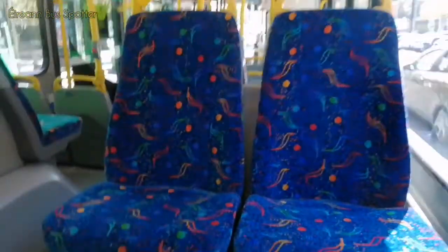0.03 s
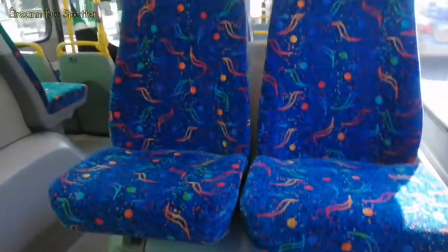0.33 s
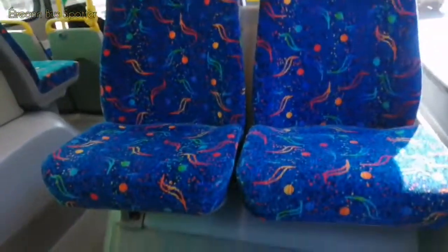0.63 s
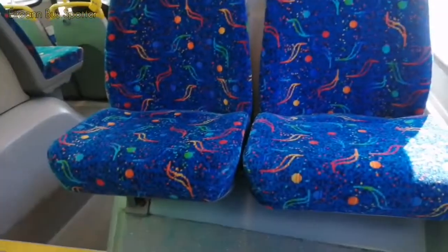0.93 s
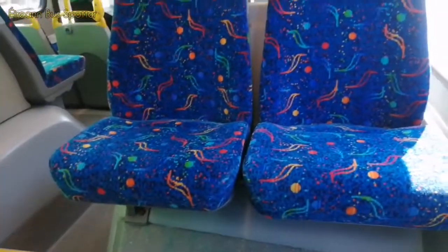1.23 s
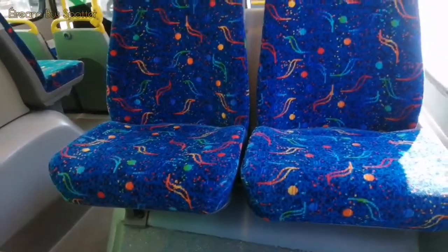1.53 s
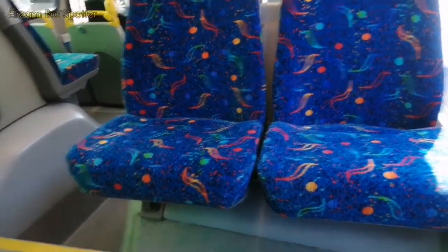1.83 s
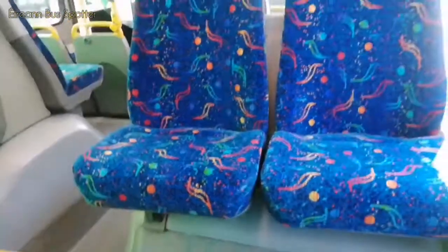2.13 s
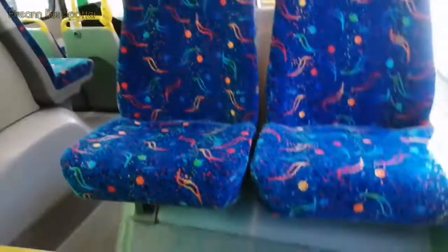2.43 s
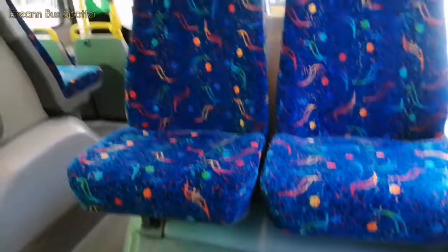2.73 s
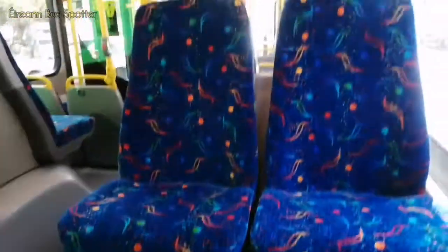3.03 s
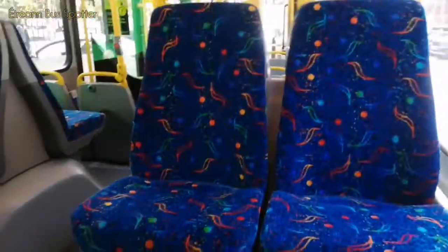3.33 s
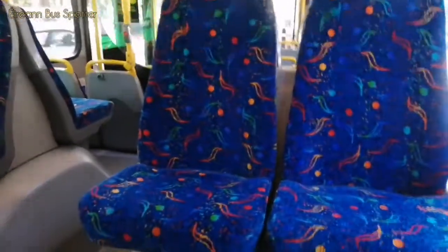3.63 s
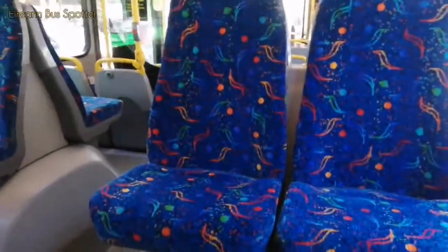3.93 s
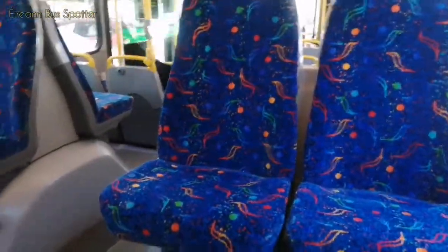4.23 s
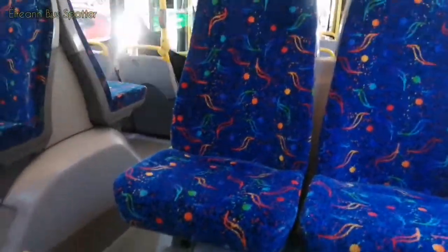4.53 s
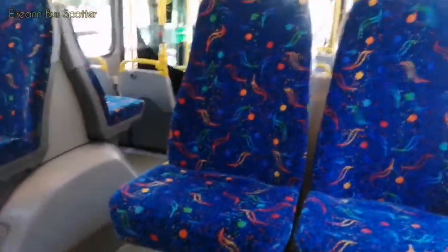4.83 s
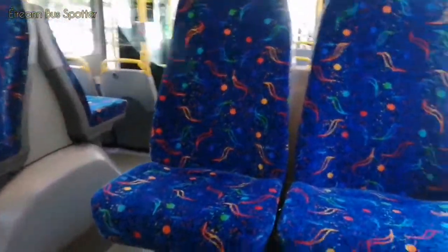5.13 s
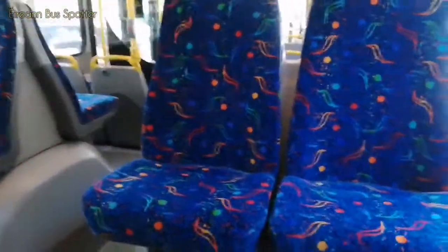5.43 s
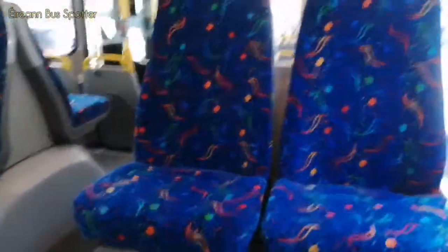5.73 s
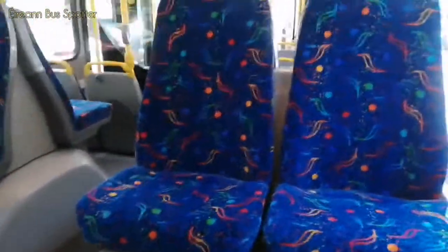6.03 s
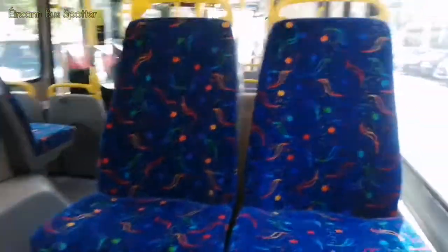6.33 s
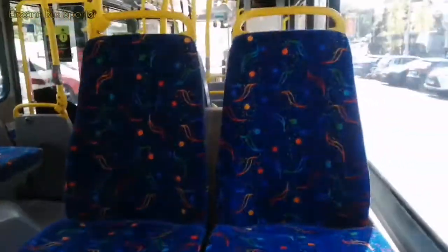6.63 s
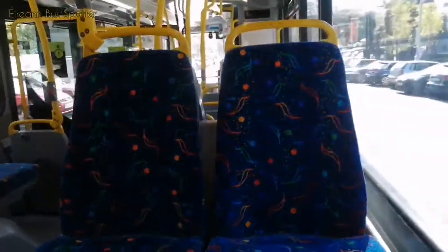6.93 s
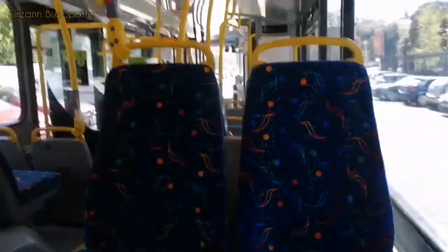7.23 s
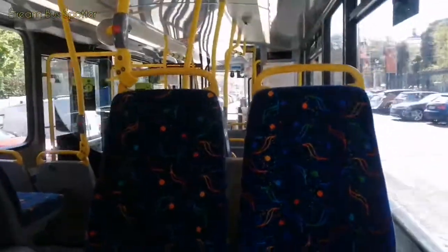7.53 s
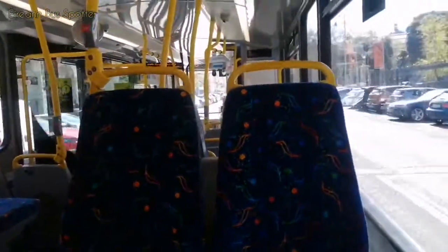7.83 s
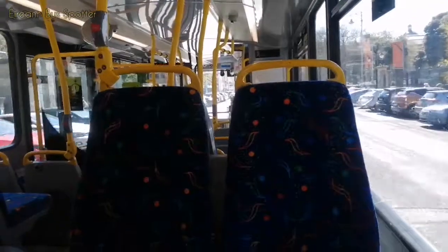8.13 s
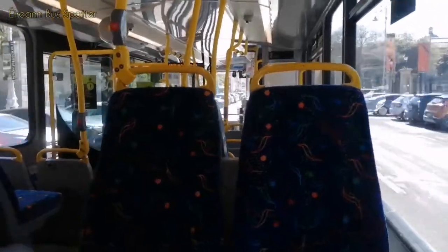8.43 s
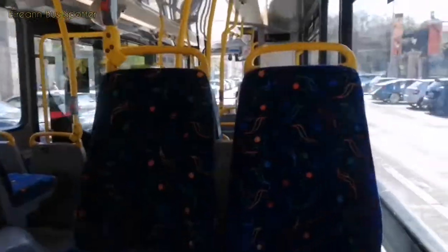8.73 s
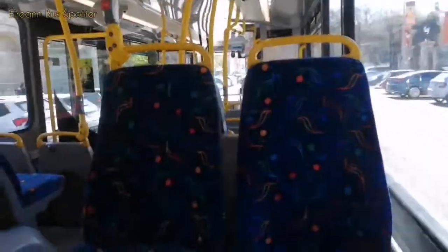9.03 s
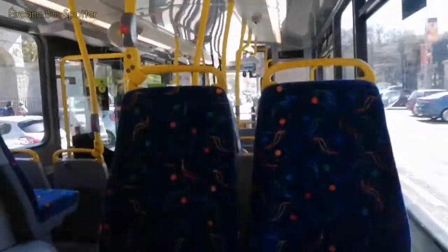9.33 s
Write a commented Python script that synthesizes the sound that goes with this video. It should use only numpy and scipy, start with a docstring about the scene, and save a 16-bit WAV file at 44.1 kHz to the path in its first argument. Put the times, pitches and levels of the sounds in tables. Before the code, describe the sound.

A city bus moves off with a faint hiss of air and a brief buzzing shudder, heard from a passenger seat. The diesel engine rumbles and booms, rising and dropping through gear changes with a faint whine. Tyre and road rumble grow as it gathers speed. Bumps thump the floor, a loose metal fitting clanks past the middle, and panels and trim rattle most busily near the end.

```python
"""A hiss of air and a low shudder with a buzzing panel: a city bus moves off, heard from inside.
The diesel climbs through three gear changes, booming as its shaft harmonics cross the cabin's
resonances. Meshing gears whine, air sings in the intake, and the tyres rumble louder with speed.
Loose trim buzzes and chatters; bumps set the floor booming and fittings clicking and knocking."""
import sys
import numpy as np
from scipy import signal
from scipy.fft import rfft, irfft, next_fast_len
from scipy.io import wavfile
from scipy.ndimage import map_coordinates

SR = 44100
rng = np.random.default_rng(int(sys.argv[2]) if len(sys.argv) > 2 else 0)


def to_wav(s):
    """Save 16-bit WAV."""
    ch = np.atleast_2d(s).T  # columns
    pcm = np.round(np.clip(ch, -1, 1) * 32767)  # PCM
    wavfile.write(sys.argv[1], SR, pcm.astype(np.int16))


N = 422037
TIME = np.arange(N) / SR

# crankshaft speed: t/s, rate/(turns/s)
SHAFT_SPEED = [(0, 11), (.2, 11.3), (1, 17.4), (1.6, 21.4), (2, 22.8), (2.5, 18), (2.8, 18.7), (3.5, 22),
               (4.1, 27), (4.55, 29.3), (5.35, 23.3), (5.7, 22.9), (6.55, 26.3), (7.15, 22.2), (7.5, 21.6),
               (8.2, 23.2), (8.9, 24.5), (9.3, 21.7), (9.57, 20.5)]
# road speed: t/s, v/(km/h)
ROAD_SPEED = [(0, 3), (2, 10.5), (2.9, 11.5), (4.7, 22), (6.4, 24.4), (6.85, 26.2), (8, 29.45), (8.6, 31),
              (9.57, 32)]
CRUISE_KMH, CRUISE_TURNS_PER_S = 25, 23  # reference speeds for the levels
# stretches of road: middle t/s, length/s, gain/dB of body heave, tyres, panels, trim, engine cover
ROAD_STRETCHES = [(.5, 0.18, 5.5, -5.5, 15, -3.5, -2), (1.54, 0.41, 5.5, 0, -1.5, 5.5, 1),
                  (2.12, 0.43, -1.5, 4.5, 6, 5, 5), (3.07, 0.16, 3.5, 1, 14.5, -4.5, 1.5),
                  (3.35, 0.15, -3, -2.5, 10, -1.5, 0), (3.74, 0.93, 0, 1.5, -3.5, 3, 1.5),
                  (5.08, 0.55, -1, 1, -2.5, 2.5, 3.5), (5.72, 0.56, 2.5, 1.5, 8, 4.5, 4.5),
                  (6.13, 0.13, 1.5, 0, 2, 5, 2), (6.48, 0.54, 4, 3, 10, 7, 7),
                  (7.35, 0.2, 1, 0, 6.5, 6, 3.5), (7.65, 0.45, 0, -1.5, 0, 0.5, -2),
                  (8.42, 0.27, 2, 1.5, 5, 3, 6), (8.88, 0.44, 1.5, 0.5, 9.5, 8.5, 10),
                  (9.37, 0.16, -4, 1, 6.5, 3.5, 4.5)]

# noise spectra: f/Hz, relative density/dB
RUMBLE_SPECTRUM = [(6, -26.5), (16, 2), (28, 2.5), (46, -4.5), (63, -3), (73, 2.5), (84, -0.5), (96, 1),
                   (115, -6.5), (160, -39.5)]  # shaken floor
DRONE_SPECTRUM = [(80, -38), (115, -5), (135, 0), (157, 3.5), (172, -2), (220, -4), (252, -7), (272, -7),
                  (305, -11), (350, -22.5), (500, -56)]  # body and cabin air
TYRE_SPECTRUM = [(220, -45), (325, -0.5), (430, 2), (500, -7.5), (545, -3.5), (620, -6), (720, -8.5),
                 (900, -17), (1400, -24), (3000, -61)]
PANEL_SPECTRUM = [(450, -22.5), (780, 2), (950, 5.5), (1100, -2), (1280, 1.5), (1480, -10), (1900, -25.5),
                  (3000, -21.5), (6000, -62.5)]
TRIM_SPECTRUM = [(1200, -37.5), (2000, -13), (2900, -6.5), (3800, -16), (4500, -6), (5100, 1.5),
                 (6000, 1.5), (6600, 4.5), (7100, 5), (7450, -7.5), (7750, -43.5), (8100, -47.5)]
COVER_SPECTRUM = [(900, -26), (1500, -0.5), (1850, -0.5), (2120, 0.5), (2350, -0.5), (2700, 4),
                  (3000, -2.5), (3250, 3), (3700, -8), (4400, -5.5), (4850, -7), (5200, -2.5), (5600, -13),
                  (8000, -30.5)]  # engine cover
TICK_SPECTRUM = [(900, -24), (2200, -9), (2800, 3.5), (3900, -0.5), (5100, 2), (6500, 3), (7450, -5),
                 (8000, -32)]  # struck fitting
RATTLE_SPECTRUM = [(300, -32.5), (800, -2), (1600, -6), (2400, -1), (3100, 2), (3900, -10.5), (5100, -0.5),
                   (6000, -5), (6900, 6), (7450, -5.5), (8000, -41.5)]  # jolted panel
BUZZ_SPECTRUM = [(150, -4), (350, 3.5), (480, -5.5), (700, -5.5), (890, -0.5), (1000, -4), (1130, -5),
                 (1300, -11), (1550, -28), (2300, -26.5), (3000, -29), (3400, -19), (3800, -35),
                 (7500, -42)]  # slapping panel

# resonances: f/Hz, bandwidth/Hz, relative level/dB
KNOCK_MODES = [(554, 300, -6), (770, 90, -0.5), (880, 51, -4.5), (967, 46, -4), (1060, 40, -7.5),
               (1360, 71, -11.5), (1490, 150, -14)]
INTAKE_LOW_MODES = [(2090, 51, -6.5), (2540, 100, -11), (2874, 220, 1.5), (3164, 430, -1.5)]
INTAKE_HIGH_MODES = [(4960, 280, -3.5), (5620, 340, -0.5)]
GEAR_CASE_MODES = [(1280, 110, -2.5), (3220, 60, 5)]
CABIN_MODES = [(20.8, 4.9, -33.5), (28, 5.9, -24.5), (34.2, 1.3, -38), (41.3, 5.5, -32.5), (48.3, 9.9, -34),
               (57, 2, -39), (72.4, 17, -28), (88, 7.6, -35), (115.4, 11, -28), (135.8, 11.4, -23),
               (155.6, 11, -28)]
# antiresonances of the cabin: f/Hz, bandwidth/Hz
CABIN_NULLS = [(32.2, 1.5), (45.2, 1.9), (53, 2.2)]

# bumps that boom: t/s, rise/s, f/Hz, peak level/dB
BUMP_BOOMS = [(1.45, .012, 145, -28), (1.735, 0.0096, 140, -20), (1.825, 0.018, 132, -23),
              (2.116, 0.019, 223, -30.5), (2.339, 0.013, 190, -30), (3.495, 0.015, 130, -23.5),
              (3.745, 0.025, 148, -22), (3.985, .014, 165, -28), (5.289, 0.045, 28.5, -21),
              (5.83, 0.042, 21.5, -18.5), (6.46, .03, 20, -15), (8.214, 0.02, 150, -20),
              (8.46, 0.024, 145, -23), (8.68, 0.096, 26, -17.5), (8.815, 0.021, 149, -20.5),
              (9.086, 0.01, 210, -24)]
# small fittings: t/s, relative level/dB, ring f/Hz, ring level/dB re the tick, ring T60/s
FITTING_CLICKS = [(0.459, -40, 3000, -12, .04), (0.672, -51, 2980, 0, .2), (0.786, -46, 6600, -10, 0.2),
                  (0.921, -45, 3100, -4, 0.38), (0.977, -22.5, 3060, -11, 0.024),
                  (1.9879, -36.5, 6950, -5, .12), (3.8456, -47, 6950, 4, 0.15),
                  (4.939, -37, 6500, 2.5, 0.082), (4.972, -42, 1610, 2, 0.14), (4.978, -31, 5200, 2, 0.058),
                  (5.209, -35.5, 6160, 3.5, .07), (6.0968, -39, 7100, -7, 0.091),
                  (6.645, -35, 5400, -6, .06), (6.66, -44, 2650, 5, 0.093), (6.9503, -32.5, 5200, 0, 0.051),
                  (7.612, -42, 2780, 3, 0.3), (8.007, -41.5, 6770, 3, 0.046), (8.4928, -34, 6900, 2, 0.055),
                  (8.559, -39, 2950, 4.5, 0.055), (8.816, -37, 2690, 4.5, 0.081),
                  (8.8865, -29, 6720, 7, 0.14), (8.962, -44, 2780, 2, 0.11), (9.005, -41, 2600, 7.5, 0.088),
                  (9.051, -31, 5560, -3, 0.068), (9.065, -39, 2700, 6, 0.086),
                  (9.087, -40, 2740, 1.5, 0.11), (9.1567, -32, 6840, 0, 0.054), (9.207, -44, 2800, 0, .07),
                  (9.237, -32.5, 6740, 3, .045), (9.392, -47, 2650, 0, 0.084)]
# jolted panels: t/s, relative level/dB, knock gain/dB, thump gain/dB, rattle T60/s
PANEL_JOLTS = [(1.363, -30.5, -8, -2, 0.39), (1.448, -41, 2.5, 6.5, 0.52), (2.347, -30, -5, 0.5, 0.28),
               (3.667, -36, -5, -3, 0.5), (5.187, -33, -28, -5, 0.34), (5.574, -49, -12, 4, 0.2),
               (6.618, -35.5, -4, -5, 0.96), (7.293, -36.5, -6, -1, 0.3), (7.351, -36, 1, 2, 1),
               (8.215, -30.5, -12, 1, 0.42), (8.259, -30.5, -2, -1, 0.11), (8.526, -25, -3.5, -7, 0.45),
               (8.707, -43, -5, 4, 0.21), (8.77, -29, -27, 3, 0.34), (8.826, -22, -5, -4, 0.18),
               (8.901, -25.5, -1.5, -6, 0.18), (9.087, -27.5, -7, -6, 0.23), (9.19, -27.5, -7, -5, 0.27),
               (9.299, -29, -6, -6, 0.17), (9.372, -26.5, -11, -3.5, 0.28)]
# a loose metal fitting: t/s, level/dB, f/Hz, jingle level/dB, jingle f/Hz, jingle T60/s
METAL_CLANKS = [(5.736, -35.5, 953, -55, 6100, 0.1), (5.865, -35, 967, -43, 6100, .1),
                (6.334, -34, 1038, -54, 6100, .1), (6.383, -26.5, 1027, -41, 6100, 0.17),
                (6.407, -48, 1050, -41, 5450, 0.23), (6.429, -33.5, 1114, -41, 5570, .2),
                (6.52, -27.5, 1030, -36, 6230, 0.12)]
# its modes: frequency ratio, relative level/dB, T60/s
METAL_MODES = [(.85, -3.5, .09), (1, -2.5, 0.086), (1.17, -6.5, 0.085), (2.15, -22.5, .07), (2.7, -21, .08),
               (3.2, -18.5, 0.076)]
# body panels under strain: middle t/s, length/s, f/Hz, level/dB
WALL_HUMS = [(2.108, 1, 270, -42), (5.099, 0.94, 421, -50), (6.5, 0.58, 290, -44), (6.557, 0.33, 532, -55),
             (8.341, 0.59, 275, -40.5), (8.914, 0.43, 319, -40.5)]
# surges of intake air: middle t/s, length/s, gain/dB of the low modes, of the high modes
INTAKE_SURGES = [(1.05, 0.98, -5, 14.5), (2.03, 0.3, 7, 7.5), (2.55, 0.34, 11.5, -11), (3.5, 0.46, -1, 6),
                 (4.2, 0.3, -0.5, 11)]
# intake whistles: start t/s, loudest t/s, end t/s, level/dB
INTAKE_WHISTLES = [(0.694, 1.148, 1.45, -68), (3.2, 3.9, 4.36, -62.5)]
# gearbox whines: start t/s, loudest t/s, end t/s, cycles per turn, level/dB, flutter depth
GEARBOX_WHINES = [(.8, 1, 1.3, 117.5, -70, .9), (3.05, 3.35, 3.9, 78.5, -70.5, 1),
                  (3.82, 4.1, 4.54, 78.5, -59, 1), (3.98, 4.17, 4.42, 116.5, -57.5, 2),
                  (3.95, 4.33, 4.8, 44, -62, 2), (3.9, 3.9, 4, 15.1, -40.5, .2)]
# axle whines under load: start t/s, loudest t/s, end t/s, level/dB
AXLE_WHINES = [(4.3, 5.098, 6.4, -45.5), (6.544, 6.951, 7.15, -46), (7.026, 7.303, 7.7, -46),
               (7.6, 8.34, 8.76, -43)]
# weak engine orders (multiples of the shaft speed): order, relative level/dB
WEAK_ORDERS = [(3, -8.5), (5, -8.5), (7, -12), (8, -14), (9, -20.5), (10, -21), (12, -26), (14, -29),
               (16, -22.5), (18, -31.5)]
# strong orders before the cabin's gain: order, level/dB, idle gain/dB, gain/dB per road speed doubling
STRONG_ORDERS = [(1, -3, -2, 1.5), (2, 1, -2, 0.5), (4, -0.56, -12, -1), (6, -7.5, 1, 3)]
# orders that drone under load: middle t/s, length/s, order, level/dB
LOAD_DRONES = [(3.6, .6, 4, -34), (5.35, .5, 4, -36), (5.65, .5, 3.25, -35), (6.35, .5, 6, -34),
               (6.9, .4, 4, -33), (4.95, .4, 6, -35), (7.3, .8, 3.25, -27.5), (7.9, .4, 6, -33),
               (8.12, .4, 7, -34), (8.45, .5, 6, -31)]


def amp(db):
    """Decibels to amplitude ratio."""
    return 10 ** (np.asarray(db) / 20)


def unit(x):
    """Normalisation to rms 1."""
    return x / np.sqrt(np.mean(x ** 2) + 1e-20)


def curve(rows):
    """Linear interpolation of (t/s, value) points at every sample."""
    return np.interp(TIME, *np.transpose(rows))


def wobble(rate):
    """Smooth random modulation, rate knots a second."""
    knots = rng.standard_normal(int(N * rate / SR) + 4)
    return map_coordinates(knots, [TIME * rate], mode="nearest")


def swells(rows):
    """Summed Gaussian swells (middle t/s, length/s, heights): one curve per column of heights."""
    return sum(np.outer(heights, .5 ** ((2 * (TIME - s) / length) ** 2)) for s, length, *heights in rows)


def gate(start, attack, end, release):
    """Trapezoidal envelope from 0 to 1 and back."""
    return np.clip(np.minimum((TIME - start) / attack, (end - TIME) / release), 0, 1)


def add(track, s, sound):
    """Superposition of a sound on a track at time s."""
    part = track[max(0, round(s * SR)):][:len(sound)]
    part += sound[:len(part)]


def filtered(x, response):
    """Linear filtering: the spectrum of x times a frequency response."""
    m = next_fast_len(len(x) + 8192)
    return irfft(rfft(x, m) * response(np.fft.rfftfreq(m, 1 / SR)), m)[:len(x)]


def coloured(x, spectrum):
    """Spectral shaping by (f/Hz, level/dB) points, at rms 1."""
    f, db = np.transpose(spectrum)
    return unit(filtered(x, lambda hz: amp(np.interp(np.log(hz + 1), np.log(f), db, -120, -120))))


def noise(spectrum, n=N):
    """Coloured Gaussian noise of rms 1."""
    return coloured(rng.standard_normal(n), spectrum)


def resonant(x, modes):
    """Parallel second-order resonators of alternating sign, at rms 1."""
    return unit(filtered(x, lambda f: sum(
        (-1) ** k * amp(db) * 1j * f * width / (hz * hz - f * f + 1j * f * width)
        for k, (hz, width, db) in enumerate(modes))))


def ringing(modes, n=N):
    """Resonators excited by white noise."""
    return resonant(rng.standard_normal(n), modes)


def contacts(rate, spread_db, t60):
    """Envelope of random impacts, rate a second, whose decaying energies add; rms 1."""
    hits = (rng.random(N) < rate / SR) * amp(spread_db * np.clip(rng.standard_normal(N), -2, 2))
    decay = amp(-60 * TIME[:SR // 4] / t60)
    energy = signal.fftconvolve(hits ** 2, decay ** 2)[:N]
    return unit(np.sqrt(np.abs(energy)))


def firing(angle, depth_db):
    """Amplitude modulation at the firing rate, twice a turn; rms 1."""
    return unit(amp(depth_db * np.cos(2 * angle)))


def road(angle, kmh, heave_db, tyre_db):
    """Structure-borne noise: tyres shake the floor and cabin air, and roar under the body."""
    doublings = np.log2(kmh / CRUISE_KMH)
    rumble = noise(RUMBLE_SPECTRUM) * amp(-29.5 + 2.5 * doublings + heave_db)
    drone = noise(DRONE_SPECTRUM) * amp(-35.3 + 4 * doublings + heave_db)
    roar_db = -43 + 3 * doublings + tyre_db + 1.2 * wobble(14)
    return rumble + drone + noise(TYRE_SPECTRUM) * firing(angle, depth_db=-0.6) * amp(roar_db)


def booms():
    """Transient response: each bump swells one low resonance of the body for a few cycles."""
    out, t = np.zeros(N), TIME[:SR // 2]
    for s, rise, hz, db in BUMP_BOOMS:
        envelope = (t / rise * np.exp(1 - t / rise)) ** 2
        add(out, s, amp(db) * envelope * np.sin(2 * np.pi * (hz * t + rng.random())))
    return out


def loose_parts(angle, kmh, panel_db, trim_db, cover_db):
    """Contact noise: panels, trim and engine cover share one jiggle and rattle harder with speed."""
    excess_kmh, jiggle = kmh - CRUISE_KMH, wobble(22)
    panels = noise(PANEL_SPECTRUM) * unit(0.82 + contacts(rate=68, spread_db=-3, t60=0.21))
    trim = noise(TRIM_SPECTRUM) * unit(3.5 + contacts(rate=92, spread_db=9.5, t60=0.047))
    cover = noise(COVER_SPECTRUM) * firing(angle, depth_db=-1)
    return (panels * amp(-58.5 + 1.03 * excess_kmh + panel_db + 1.5 * jiggle)
            + trim * amp(-53 + 0.66 * excess_kmh + trim_db + 1.8 * jiggle)
            + cover * amp(-57.5 + 0.33 * excess_kmh + cover_db + 1.1 * jiggle))


def clicks(ring_width_hz=200, tick_share=0.27):
    """Impact and free decay: a fitting's hard tick dies in a share of its ring time."""
    out, t = np.zeros(N), TIME[:SR // 4]
    for s, db, hz, ring_db, t60 in FITTING_CLICKS:
        fade_db = -60 * t / t60
        tick = noise(TICK_SPECTRUM, len(t)) * amp(fade_db / tick_share)
        ring = ringing([(hz, ring_width_hz, 0)], len(t)) * amp(ring_db + fade_db)
        add(out, s, amp(db - 7.5) * (tick + ring) * (1 - np.exp(-t / 0.00033)))
    return out


def jolts(knock_t60=0.2, thump_t60=0.25):
    """Impact excitation: a bump thumps the body and knocks a panel, which rattles as it settles."""
    panels, thumps, t = np.zeros(N), np.zeros(N), TIME[:SR // 2]
    for s, db, knock_db, thump_db, t60 in PANEL_JOLTS:
        onset = amp(db) * (1 - np.exp(-t / 0.0014))
        rattle = noise(RATTLE_SPECTRUM, len(t)) * amp(-12 - 60 * t / t60)
        knock = ringing(KNOCK_MODES, len(t)) * amp(knock_db - 7 - 60 * t / knock_t60)
        thump = noise(DRONE_SPECTRUM, len(t)) * amp(thump_db - 60 * t / thump_t60)
        add(panels, s, onset * (rattle + knock))
        add(thumps, s, onset * thump)
    return thumps + panels * unit(5 + contacts(rate=110, spread_db=3, t60=0.046))


def clanks(jingle_width_hz=320, detune=0.022):
    """Inharmonic modes ring as metal strikes metal; the fitting jingles as it bounces to rest."""
    rings, jingles, t = np.zeros(N), np.zeros(N), TIME[:SR // 3]
    for s, db, hz, jingle_db, jingle_hz, jingle_t60 in METAL_CLANKS:
        ring = np.zeros(len(t))
        for ratio, mode_db, t60 in METAL_MODES:
            mode_hz = ratio * hz * (1 + detune * rng.standard_normal())
            ring += amp(mode_db - 60 * t / t60) * np.sin(2 * np.pi * mode_hz * t)
        scrape = ringing(KNOCK_MODES, len(t)) * amp(-4.5 - 60 * t / 0.12)
        add(rings, s, amp(db) * (ring + scrape) * (1 - np.exp(-t / 0.0015)))
        jingle = ringing([(jingle_hz, jingle_width_hz, 0)], len(t))
        add(jingles, s, jingle * amp(jingle_db - 60 * t / jingle_t60) * (1 - np.exp(-t / 0.0014)))
    return rings + jingles * unit(4 + contacts(rate=170, spread_db=7, t60=0.02))


def moving_off(angle, fade_db_per_s=31.5):
    """Forced vibration: the body shudders and a panel slaps at each firing, as air hisses away."""
    hiss = noise(TRIM_SPECTRUM) * amp(-59)
    idle_chatter = noise(PANEL_SPECTRUM) * amp(-58.5)
    buzz = noise(BUZZ_SPECTRUM) * amp(-41.5)
    shudder = noise(DRONE_SPECTRUM) * amp(-35.5)
    judder = firing(angle, depth_db=2.5) * gate(start=0.035, attack=0.16, end=0.448, release=0.14)
    return (hiss + idle_chatter) * amp(-fade_db_per_s * TIME) + (buzz + shudder) * judder


def walls(angle, width_hz=30):
    """Panel resonance: body panels hum in turn, each at its own pitch, shaken by the firing."""
    out = np.zeros(N)
    for s, length, hz, db in WALL_HUMS:
        hum = resonant(ringing([(hz, 2 * width_hz, 0)]), [(hz, width_hz, 0)])
        out += hum * swells([(s, length, amp(db))])[0]
    return out * firing(angle, depth_db=5.5)


def whistle(hz=5220, width_hz=110):
    """Narrow-band resonance: intake air whistles thinly at one pitch as the engine pulls."""
    tone = resonant(ringing([(hz, 3 * width_hz, 0)]), [(hz, width_hz, 0)])
    return tone * sum(amp(db) * np.sqrt(gate(start, loudest - start, end, end - loudest))
                      for start, loudest, end, db in INTAKE_WHISTLES)


def intake(speed, db_per_doubling=11.5):
    """Flow noise excites the intake's resonances in uneven puffs, louder with engine speed."""
    low = unit(ringing(INTAKE_LOW_MODES) + 0.22 * noise(COVER_SPECTRUM))
    high = unit(ringing(INTAKE_HIGH_MODES) + 0.22 * noise(COVER_SPECTRUM))
    low = coloured(low, [(1500, -13), (2000, -2), (3350, -1), (3800, -11.5), (5000, -35.5)])
    high = coloured(high, [(3500, -20), (4900, -3), (6200, 2), (7500, -15)])
    low_db, high_db = swells(INTAKE_SURGES) + db_per_doubling * np.log2(speed / CRUISE_TURNS_PER_S)
    return low * amp(-64.5 + low_db + 2.5 * wobble(12)) + high * amp(-72 + high_db)


def whine(hz, start, loudest, end, db, depth, swell_db=10.5, edge_s=0.12):
    """Random amplitude and phase modulation roughen a swelling tone; higher ones flutter faster."""
    flutter_rate = np.interp(loudest, TIME, hz) / 17
    flutter = 1 + depth * (wobble(flutter_rate) + 1j * wobble(flutter_rate))
    tone = unit((flutter * np.exp(2j * np.pi * np.cumsum(hz) / SR)).real)
    level_db = db + np.interp(TIME, [start, loudest, end], [-swell_db, 0, -swell_db])
    return tone * gate(start, edge_s, end, edge_s) * amp(level_db + 1.4 * wobble(11))


def gears(speed, kmh, axle_hz_per_kmh=18.4):
    """Tooth-mesh tones: the gearbox follows engine speed, the axle road speed; the case rings."""
    gearbox = sum(whine(teeth * speed, start, loudest, end, db, depth)
                  for start, loudest, end, teeth, db, depth in GEARBOX_WHINES)
    axle = sum(whine(axle_hz_per_kmh * kmh, *row, depth=0.5) for row in AXLE_WHINES)
    slip_hz = 678 - 50.2 * (TIME - 0.59)  # sinks as the drive takes hold
    slip = whine(slip_hz, start=0.59, loudest=0.59, end=1.1, db=-54.5, depth=0.43)
    case = ringing(GEAR_CASE_MODES) * swells([(4.65, 1.5, amp(-61.5))])[0]  # near top engine speed
    return gearbox + case + axle + slip


def cabin_gain(hz):
    """Frequency response of the cabin: Lorentzian peaks with dead spots between them."""
    def lorentzian(centre, width):
        return 1 / (1 + (2 * (hz - centre) / width) ** 2)
    peaks = sum(amp(db) * lorentzian(centre, width) for centre, width, db in CABIN_MODES)
    return peaks * np.prod([1 - lorentzian(*null) for null in CABIN_NULLS], axis=0)


def engine(angle, speed, kmh, throttle_open_s=0.79):
    """Swept resonance: shaft orders boom and drop out across the cabin's modes, and swell under load."""
    idling = np.interp(TIME, [0, throttle_open_s], [1, 0])
    road_doublings = np.log2(kmh / CRUISE_KMH)
    weak_gain = amp(-35.5 + 9.5 * np.log2(speed / CRUISE_TURNS_PER_S))
    gains = {order: amp(db) * weak_gain for order, db in WEAK_ORDERS}
    for order, db, idle_db, growth_db in STRONG_ORDERS:
        drive = amp(db + idle_db * idling + growth_db * road_doublings)
        gains[order] = drive * cabin_gain(order * speed)
    for s, length, order, db in LOAD_DRONES:
        gains[order] = np.hypot(gains.get(order, 0), swells([(s, length, amp(db))])[0])  # powers add
    out = np.zeros(N)
    for order, gain in gains.items():
        tone = np.sin(order * angle + rng.uniform(0, 2 * np.pi))
        out += gain * unit(tone * amp(1.5 * wobble(9)))
    throb = unit(amp(2.5 * np.cos(angle / 2)))  # unequal cylinders: once in two turns
    return out * throb


def scene():
    """Superposition of the drive, the rattles and the road noise in the cabin."""
    speed, kmh = curve(SHAFT_SPEED), curve(ROAD_SPEED)
    heave_db, tyre_db, *shake_db = swells(ROAD_STRETCHES)
    hunting = 1 + 0.0024 * wobble(7)
    angle = 2 * np.pi * np.cumsum(speed * hunting) / SR  # crankshaft angle/rad
    drive = engine(angle, speed, kmh) + walls(angle) + intake(speed) + whistle()
    drive += gears(speed, kmh) + moving_off(angle)
    rattles = loose_parts(angle, kmh, *shake_db) + clicks() + jolts() + clanks()
    return (drive + road(angle, kmh, heave_db, tyre_db) + booms() + rattles)[None]


def record(dry):
    """Band limiting: a steep low-pass removes the highest treble."""
    cutoff_hz = 7650
    return filtered(dry[0], lambda hz: 1 / np.sqrt(1 + (hz / cutoff_hz) ** 160))[None]


dry = scene()
out = record(dry)
to_wav(out)
```